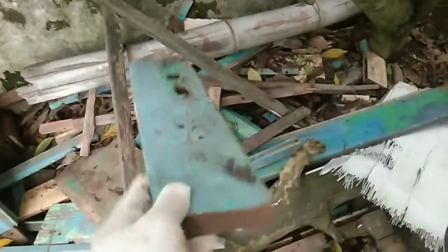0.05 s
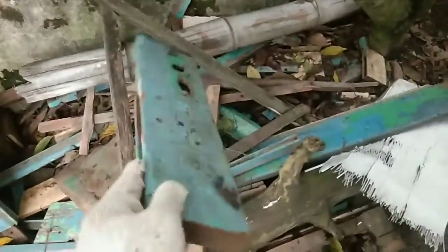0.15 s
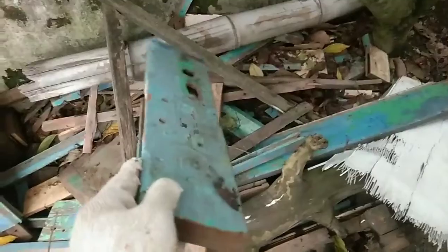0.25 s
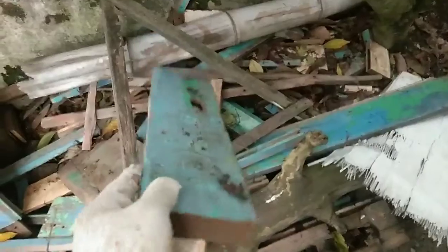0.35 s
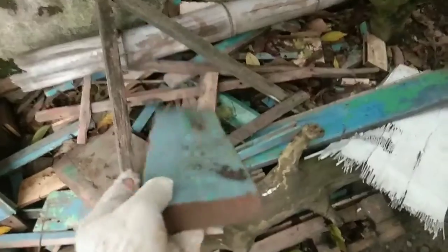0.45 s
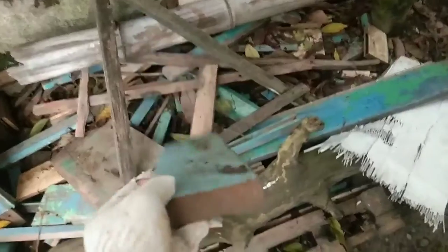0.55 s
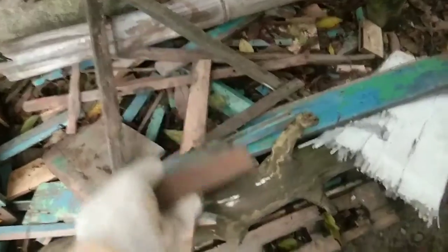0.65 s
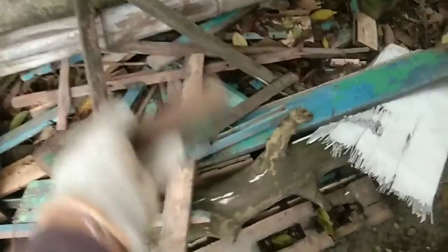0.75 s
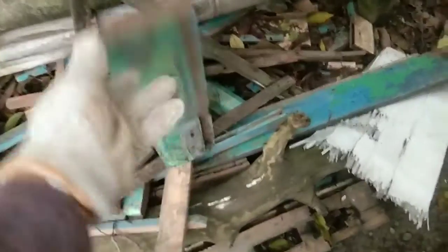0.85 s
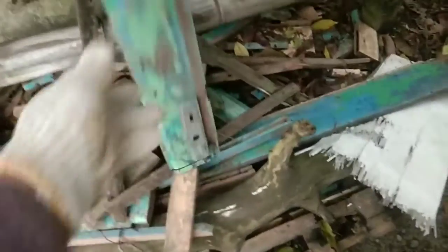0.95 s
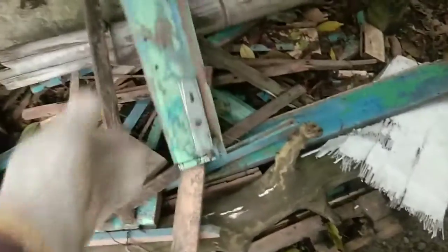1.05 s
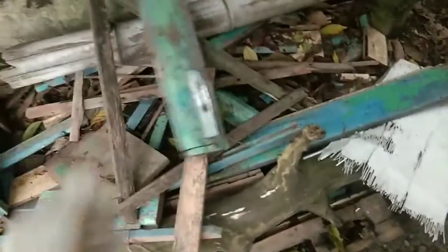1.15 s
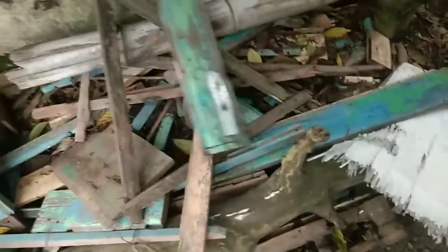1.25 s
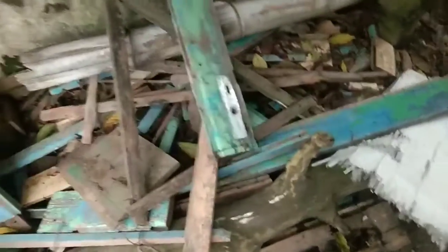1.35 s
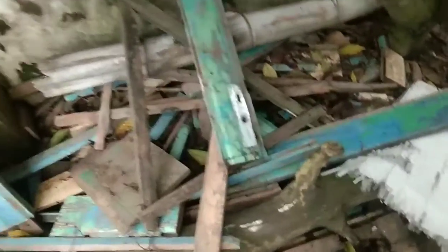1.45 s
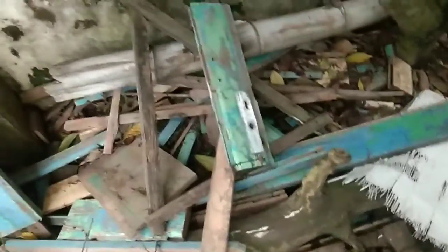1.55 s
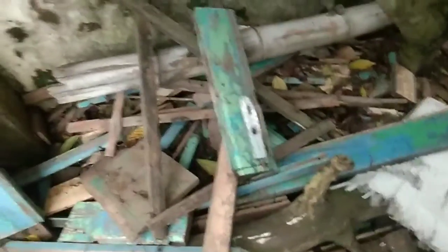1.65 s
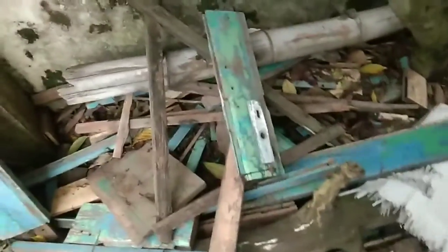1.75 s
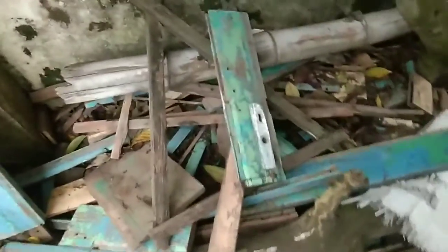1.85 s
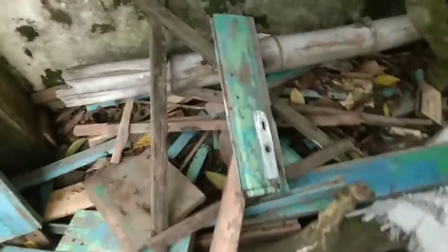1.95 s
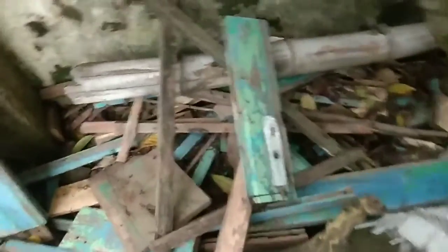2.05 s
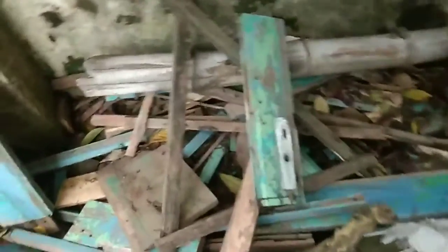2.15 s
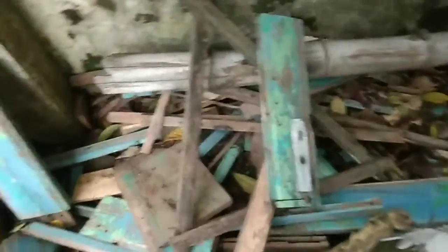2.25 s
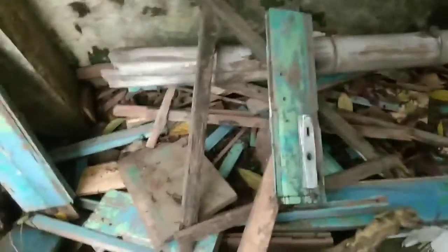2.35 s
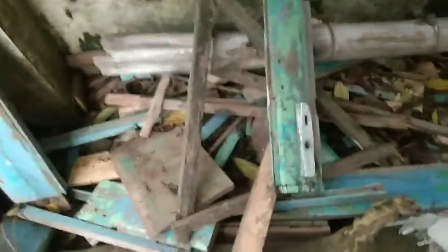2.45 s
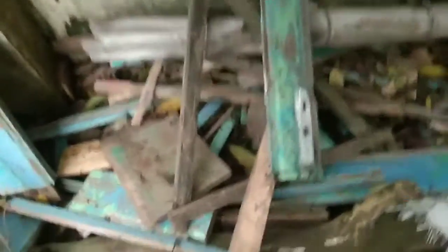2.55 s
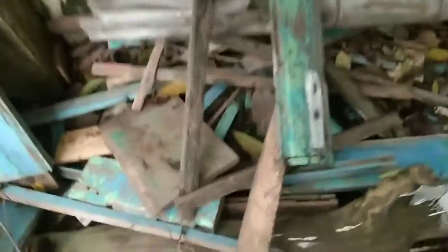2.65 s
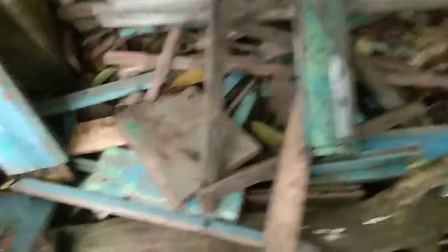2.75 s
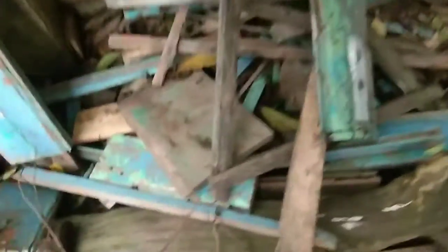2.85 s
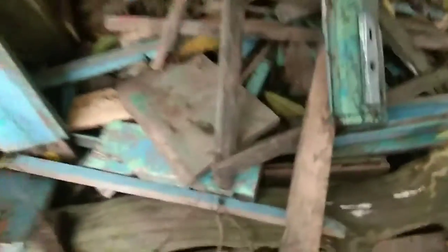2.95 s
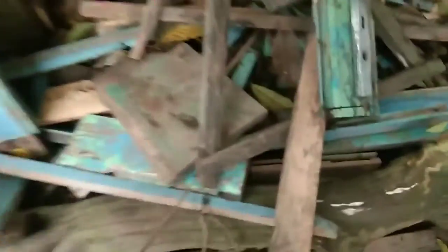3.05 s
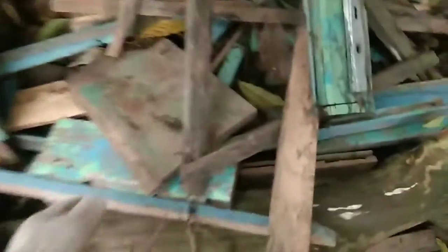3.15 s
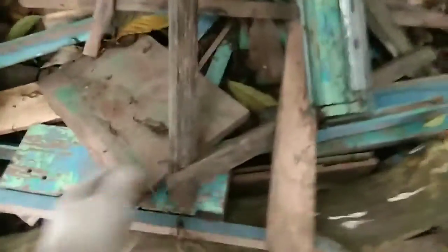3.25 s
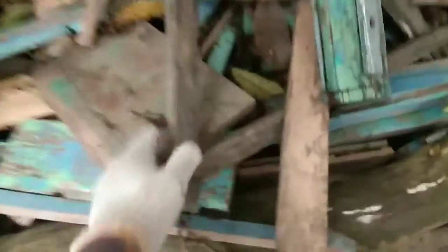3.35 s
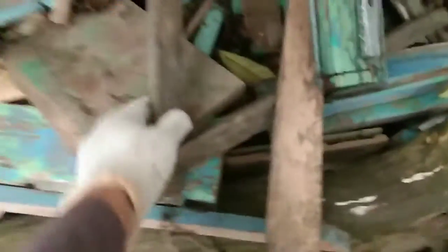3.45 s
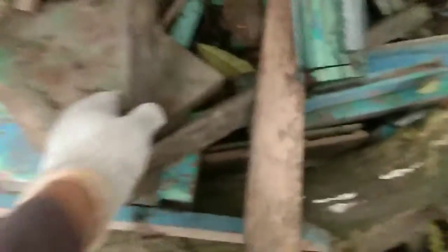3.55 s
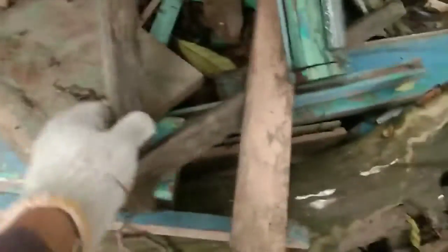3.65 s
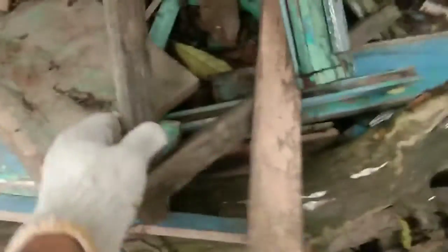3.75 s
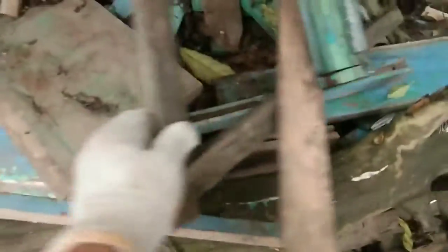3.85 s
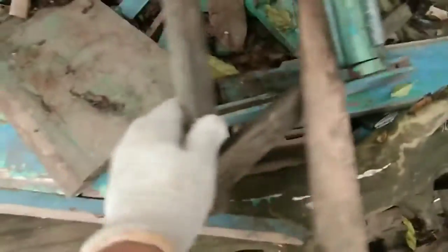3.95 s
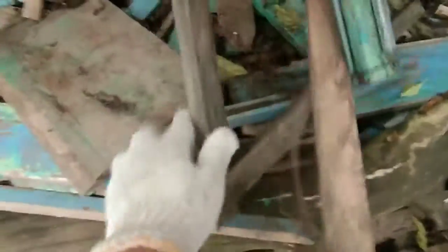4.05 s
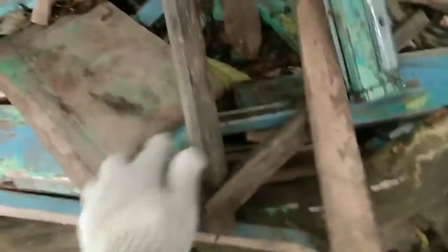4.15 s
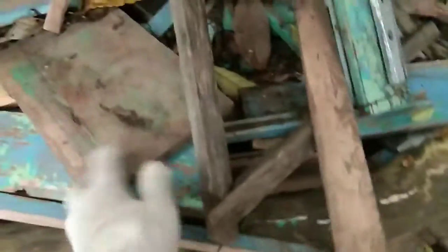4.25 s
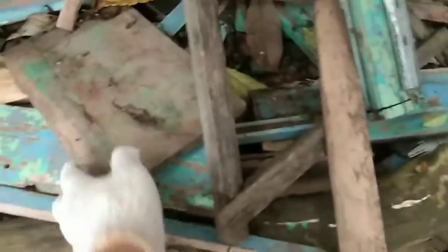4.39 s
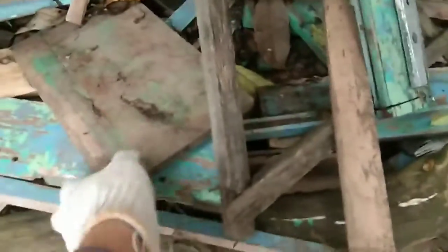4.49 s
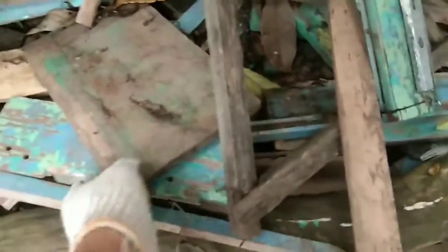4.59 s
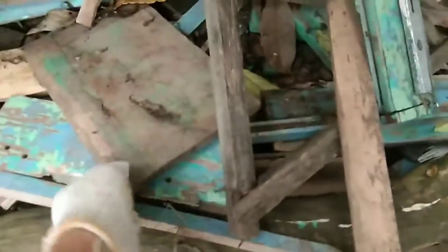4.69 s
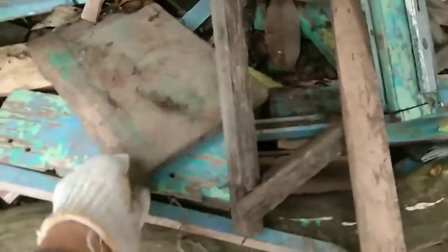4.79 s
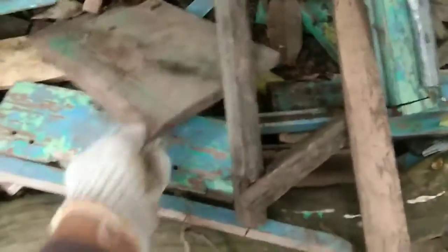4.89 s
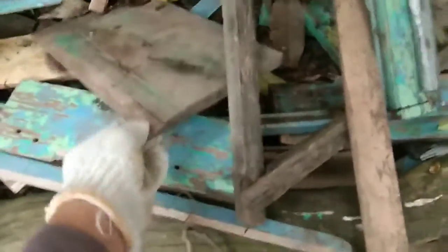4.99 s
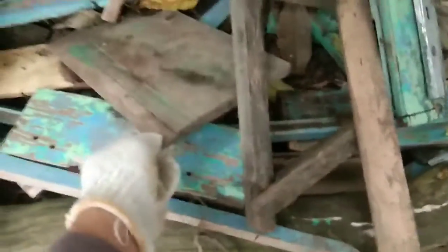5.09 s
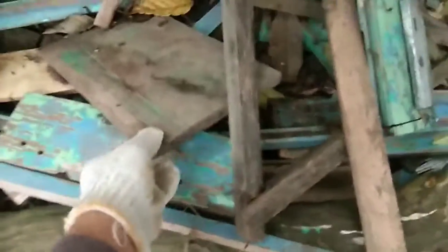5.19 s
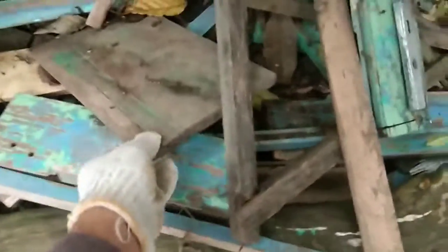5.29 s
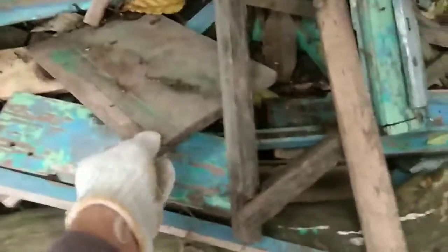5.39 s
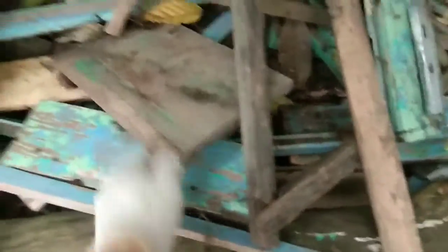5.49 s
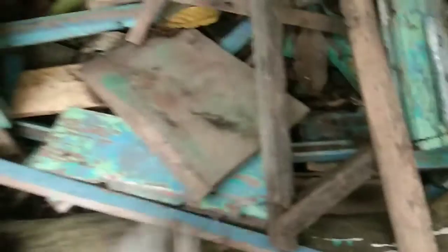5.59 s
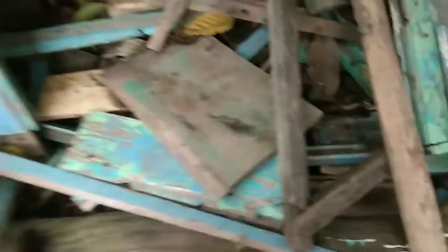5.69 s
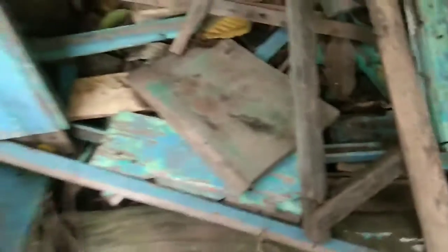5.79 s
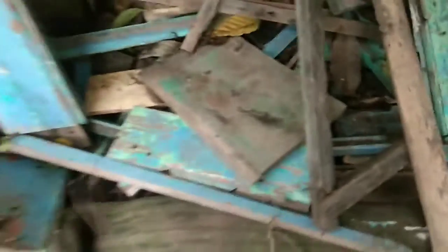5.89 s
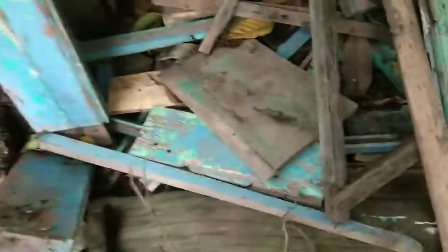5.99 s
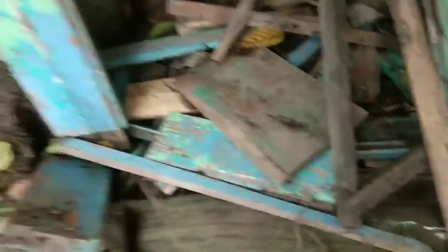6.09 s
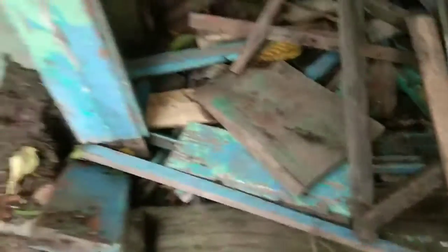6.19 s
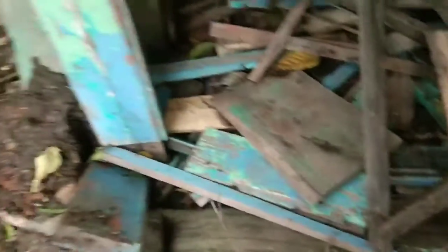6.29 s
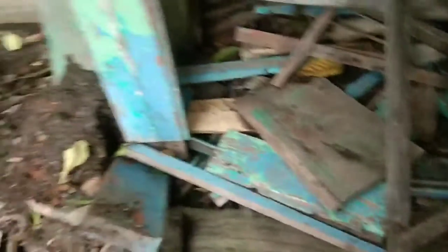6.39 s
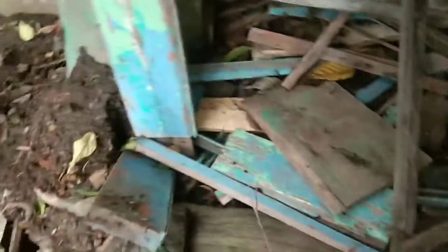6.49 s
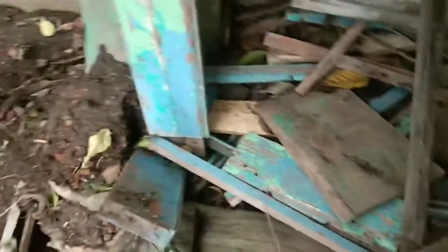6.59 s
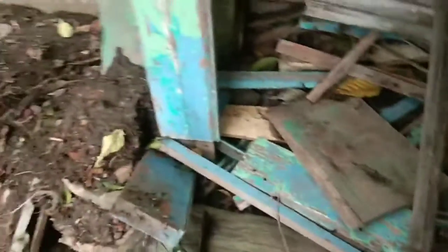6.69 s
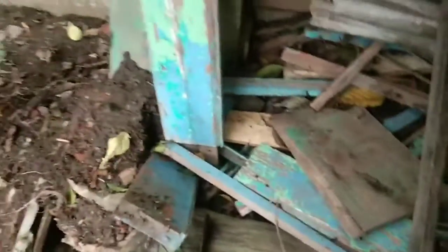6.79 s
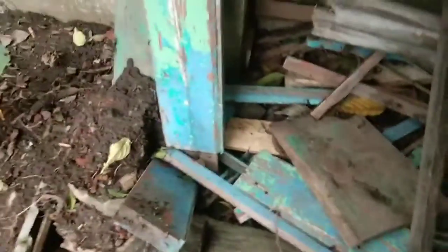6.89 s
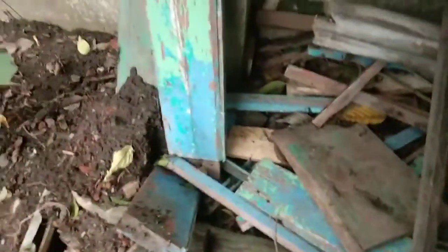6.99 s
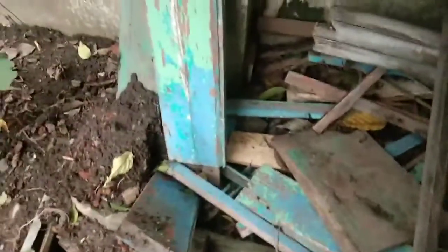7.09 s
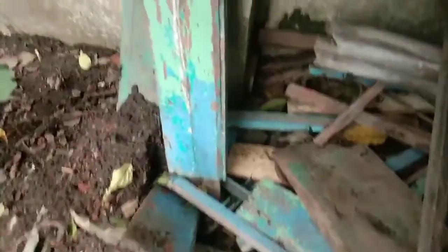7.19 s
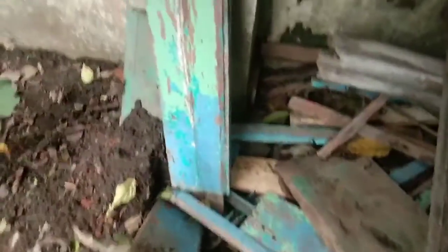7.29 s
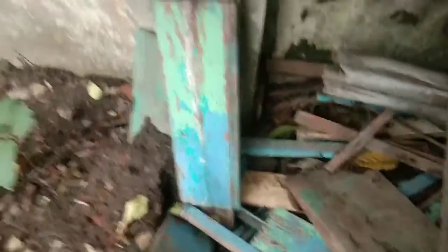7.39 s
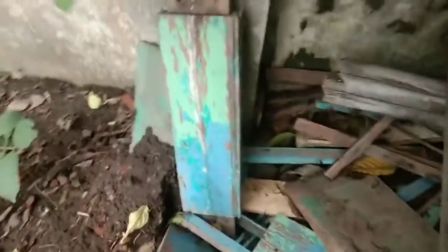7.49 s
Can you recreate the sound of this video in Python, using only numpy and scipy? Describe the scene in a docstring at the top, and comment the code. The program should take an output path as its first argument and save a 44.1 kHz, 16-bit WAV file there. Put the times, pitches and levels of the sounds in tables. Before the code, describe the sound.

A tossed plank lands on scrap wood with a loud double clack and metal jingle, then a hand knocks and scrapes other boards.

```python
"""A tossed plank lands on a scrap pile with a double clack that overloads a small, close microphone.
The blows make the wood ring and shake a loose metal fitting, which jingles.
Then a gloved hand scrapes and knocks other boards. Splinters and dry leaves crackle,
a far bird calls once, and the walls of the yard add a faint echo.
Behind it all are a low rumble, a rustling sleeve and a steady hiss."""
import sys
import numpy as np
from scipy import signal
from scipy.fft import rfft, irfft
from scipy.io import wavfile

SR = 44100
rng = np.random.default_rng(int(sys.argv[2]) if len(sys.argv) > 2 else 0)


def log_audio(samples):
    """Write samples as a 16-bit WAV file to the path given in sys.argv[1]."""
    # one column per channel
    frames = np.atleast_2d(samples).T
    # limit to full scale, then quantise
    limited = np.clip(frames, -1, 1)
    pcm = np.round(limited * 32767).astype(np.int16)
    wavfile.write(sys.argv[1], SR, pcm)


N = 332324
TIME = np.arange(N) / SR  # seconds through the whole scene
AGE = TIME[:SR // 2]  # seconds since one short sound began

# The tones of a bending plank. A fade time is how long a sound takes to drop by 60 dB.
# columns: pitch_hz, level_db, fade_s
PLANK_TONES = [(460, -6, .08), (530, -9, .06), (660, -10, .05), (770, -5, .08), (916, -3, .07),
               (996, -3, .09), (1040, -9, .18), (1163, -9, .15), (1325, -3, .07), (1486, -11, .13),
               (1637, -9, .05), (1757, -9, .08), (1900, -9, .09), (2035, -10, .12), (2146, -7, .09),
               (2256, -16, .2), (2430, -13, .13), (2685, -13, .1), (2948, -11, .1), (3240, -12, .08)]
# Blows of wood on wood; the faint rows at 1.034 s and 1.3463 s are echoes of the loud hits returning from the
# yard walls. The scuff is how long the boards grind together. # columns: start_s, level_db, pitch_hz,
# brightness_hz, scuff_s
KNOCKS = [(.956, -7.5, 1350, 2150, 0.0014), (1.034, -31.5, 1400, 2600, 0.0031),
          (1.2532, 4.5, 880, 2360, .0012), (1.264, -10.5, 750, 3000, 0.0056),
          (1.2763, 1.5, 1030, 3800, 0.00088), (1.279, -2, 997, 1850, .003), (1.285, -10, 1320, 2050, .006),
          (1.3463, -18, 1130, 2200, 0.014), (3.351, -38.5, 446, 1000, .001),
          (3.7624, -24, 890, 2640, .0016), (3.808, -31.5, 780, 2300, 0.024),
          (3.8553, -27.5, 1200, 3800, .001), (3.876, -25.5, 1140, 2300, .008),
          (3.971, -33, 796, 2300, .005), (4.194, -23.5, 1310, 2900, 0.0089),
          (4.2305, -16, 1230, 2290, 0.012), (4.2463, -6.5, 617, 2080, .004),
          (4.252, -16, 990, 1950, 0.0032), (4.3178, -22.5, 800, 2600, .005),
          (4.3438, -22.5, 670, 2130, 0.016), (4.3825, -27.5, 900, 2820, 0.0077),
          (4.8498, -32.5, 770, 3000, 0.0045), (4.9866, -25, 806, 3200, .001),
          (5.0504, -29.5, 580, 2170, 0.0035), (5.668, -25.5, 470, 3100, .002),
          (5.685, -25.5, 745, 2300, .003), (5.691, -23.5, 245, 3720, 0.0023)]


def knocks(tones_db=-16, rattle_db=-7, crack_db=-2, crack_fade_s=0.021, note_cycles=22):
    """Each blow cracks where it lands, rings the plank, and rattles and thumps the pile below."""
    tone_hz, tone_db, tone_fade_s = np.transpose(PLANK_TONES)[:, :, None]
    signs = (-1) ** np.arange(len(tone_hz))[:, None]
    tones = signs * gain(tone_db) * np.sin(2 * np.pi * tone_hz * AGE)
    out = np.zeros(N)
    for start_s, level_db, pitch_hz, brightness_hz, scuff_s in KNOCKS:
        rattle_fade_s = 0.032 + 13 * scuff_s  # a longer scuff rattles longer
        dying = fade(tone_fade_s * np.sqrt(rattle_fade_s / 0.054))  # and lets the board ring longer
        shares = gain(3 * rng.standard_normal(len(tone_hz)))  # each spot favours different tones
        plank = gain(tones_db) * (shares @ (tones * dying))
        note_db = 1.5 - 13 * max(np.log2(brightness_hz / 1980), 0)  # sharp blows hide the hollow note
        note = gain(note_db) * np.sin(2 * np.pi * pitch_hz * AGE) * fade(note_cycles / pitch_hz)
        loudness = gain(rattle_db) * fade(rattle_fade_s) + gain(crack_db) * fade(crack_fade_s)
        loudness = np.interp(AGE - scuff_s, AGE, loudness)  # stays up until the scuff ends
        clatter = loudness * rng.standard_normal(len(AGE))
        blow = keep_side(plank + note + clatter, 0.74 * pitch_hz, "high")  # narrow boards lack bass
        blow += pile_thud(level_db, pitch_hz)
        blow = keep_side(blow, brightness_hz, "low", order=3)  # a soft contact sounds dull
        add(out, start_s, gain(level_db) * blow)
        add(out, start_s, pile_shudder(level_db))
    return out


def pile_thud(blow_db, board_hz, thud_hz=135, fade_s=0.069):
    """The pile thumps under a blow; low-pitched boards shake it most."""
    thud = normalize(resonance(rng.standard_normal(len(AGE)), thud_hz, 0.88)) * fade(fade_s)
    share_db = -17 - 0.19 * blow_db  # the pile gives way under hard blows
    return gain(share_db) * thud * thud_hz / board_hz


def pile_shudder(blow_db, low_hz=850, high_hz=3460, fade_s=0.47):
    """Loose boards keep shaking after a blow, far more after a hard one."""
    shudder = keep_side(rng.standard_normal(len(AGE)), low_hz, "high")
    shudder = keep_side(shudder, high_hz, "low", order=3)
    share_db = -21.5 + 0.67 * blow_db
    return gain(blow_db + share_db) * shudder * fade(fade_s)


# The tones of the metal fitting when it is free to ring.
# columns: pitch_hz, level_db, fade_s
METAL_TONES = [(4156, -7, .3), (4247, 3, .2), (4867, 1, .22), (5480, -14, .2), (6010, -10, .3),
               (6570, -8, .33), (6885, -13, .25), (7120, -10, .35), (7490, -5, .25), (8120, -4, .2),
               (8366, -5, .33), (9350, -15, .2), (10020, -7, .2), (10290, -4, .25), (10450, -5, .25),
               (10880, -8, .28), (12350, -12, .3), (12750, -14, .35), (14700, -14, .3), (15280, -10, .25)]
# Jolts that shake the fitting. Freedom runs from 0 (pinched tight) to 1 (free).
# columns: start_s, level_db, freedom
JOLTS = [(.94, -18, 0.29), (1.26, 2, 0.22), (1.269, -10.5, 1), (1.322, -18.5, 0.97), (1.429, -27.5, 0.46),
         (3.853, -19.5, 0.42), (3.894, -21.5, 0.44), (4.2262, -5, 0.23), (4.253, -10.5, 0.53),
         (4.361, -26, 0.7)]


def metal_fitting(trim_db=-9, rise_s=0.0031, chatter_depth=0.64, chatter_hz=25,
                  buzz_db=-5, buzz_fade_s=0.59, pinched_hz=8600, free_hz=3500):
    """Thin, loose metal rings after each jolt and chatters against the wood that holds it."""
    hz, tone_db, fade_s = np.transpose(METAL_TONES)[:, :, None]
    out = np.zeros(N)
    for start_s, level_db, freedom in JOLTS:
        low_hz = pinched_hz * (free_hz / pinched_hz) ** freedom  # freer metal reaches lower tones
        strength = gain(tone_db) / np.sqrt(1 + (low_hz / hz) ** 8)
        phase = rng.uniform(0, 2 * np.pi, hz.shape)
        tones = np.exp(1j * (2 * np.pi * hz * AGE + phase))
        jitter = normalize(keep_side(rng.standard_normal((2, len(hz), len(AGE))), chatter_hz, "low"))
        chatter = 1 + chatter_depth * (jitter[0] + 1j * jitter[1])  # repeated taps upset each tone
        ring = (strength * chatter * fade(fade_s * freedom) * tones).real.sum(0)
        buzz = keep_side(rng.standard_normal(len(AGE)), low_hz, "high")
        buzz *= gain(buzz_db) * fade(buzz_fade_s * freedom)
        rise = 1 - np.exp(-AGE / rise_s)
        add(out, start_s, gain(level_db + trim_db) * (ring + buzz) * rise)
    return out


# Slides of wood or glove over rough grain.
# columns: start_s, length_s, level_db, squeak_hz, squeak_db, treble_db
SCRAPES = [(.876, 0.095, -37, 2200, -10, -4.5), (3.518, 0.018, -35, 2100, 21, 8),
           (3.675, 0.16, -44.5, 678, 19.5, -11), (3.849, .1, -35.5, 2180, -11, 0),
           (4.087, .2, -42.5, 1950, 6, -10), (4.192, .15, -31, 2170, -18, -7),
           (4.538, 0.037, -33, 2190, 14.5, 10), (4.8, 0.1, -44, 2240, 14, 5),
           (4.931, 0.055, -42.5, 2300, 13, -7), (4.964, 0.044, -34.5, 1990, 19, -8),
           (5.123, 0.012, -34, 2030, 18, 10), (5.4594, 0.01, -35, 2040, 16, 4),
           (5.529, 0.078, -37.5, 2155, 22, -1), (5.635, 0.073, -36, 2220, -1, 2)]


def scrapes(trim_db=-1, slips_per_s=5000, sharpness=12, overtone_ratio=1.51, overtone_db=-7.5):
    """Wood fibres catch and slip in quick ticks; the board rings with them in a dry squeak."""
    out = np.zeros(N)
    for start_s, length_s, level_db, squeak_hz, squeak_db, treble_db in SCRAPES:
        slips = normalize(random_ticks(len(AGE), slips_per_s, spread_db=4))
        slips = keep_side(slips, hz=700, side="high", order=1)
        treble = keep_side(slips, hz=4500, side="high", order=1)
        slips += (gain(treble_db) - 1) * treble
        progress = AGE / length_s
        stroke = np.clip(10 * progress, 0, 1) * np.exp(-0.14 * progress - progress ** 6)  # rise, sag, stop
        rub = slips * stroke
        squeak = resonance(rub, squeak_hz, sharpness)
        squeak += gain(overtone_db) * resonance(rub, overtone_ratio * squeak_hz, sharpness)
        scrape = rub + gain(squeak_db) * squeak
        average_level = np.sqrt(np.sum(scrape ** 2) / (length_s * SR))
        add(out, start_s, gain(level_db + trim_db) * scrape / average_level)
    return out


# Spells of crackling from disturbed splinters and dry leaves.
# columns: start_s, length_s, level_db
CRACKLES = [(.49, .05, -45), (.87, .08, -40), (1.48, .5, -44), (3.3, .4, -49.5), (4.38, 1, -48.5),
            (5.54, .17, -41.5), (6.1, .6, -54)]


def litter(ticks_per_s=600, treble_db=9):
    """Splinters and dry leaves give way in tiny random ticks."""
    ticks = keep_side(random_ticks(N, ticks_per_s, spread_db=3), hz=1800, side="high", order=1)
    treble = gain(treble_db) * keep_side(ticks, hz=7000, side="high")
    return normalize(ticks + treble) * swells(CRACKLES, shape=0.37)


def bird(start_s=6.77, length_s=0.115, from_hz=5950, to_hz=7300, level_db=-55):
    """A far bird gives one thin whistle that holds its note, then slides up."""
    progress = np.clip((TIME - start_s) / length_s, 0, 1)
    pitch_hz = from_hz + (to_hz - from_hz) * progress ** 2.5
    whistle = np.sin(2 * np.pi * np.cumsum(pitch_hz) / SR)
    return whistle * swells([(start_s, length_s, level_db)], shape=0.5)


# How long low and high sounds linger in the yard.
# columns: pitch_hz, fade_s
YARD_FADES = [(150, 0.65), (1000, 0.5), (2200, 0.49), (5000, 0.6), (12000, 0.054)]


def yard_echo(sound, scatter_db=-22, build_s=0.007, echo_db=-32, echo_s=0.061):
    """Sound scatters off the pile and walls, and one faint echo returns from the far wall."""
    hz, seconds, bands = signal.stft(rng.standard_normal(len(AGE)), SR, nperseg=256)
    dying = np.exp(-np.log(1000) * seconds / value_at(YARD_FADES, hz)[:, None])
    tail = signal.istft(bands * dying, SR)[1][:len(AGE)]
    tail *= 1 - np.exp(-AGE / build_s)
    tail *= gain(scatter_db) / np.linalg.norm(tail)
    add(tail, echo_s, gain([echo_db]))
    return signal.fftconvolve(sound, tail)[:N]


# The rustle's mix of low and high sound.
# columns: pitch_hz, level_db
RUSTLE_COLOUR = [(40, -40), (100, -6), (180, -0.5), (260, -7), (400, -16.5), (700, -26.5), (1500, -40),
                 (4000, -63)]
# Arm movements that rub the sleeve.
# columns: start_s, length_s, level_db
ARM_MOVES = [(-.03, 0.32, -36), (.4, 0.42, -36), (.78, 0.33, -41), (1.1, 0.61, -43), (1.93, 0.53, -42),
             (2.52, 0.43, -48), (4.85, 0.64, -48)]


def sleeve_rustle(trim_db=-1, still_db=-52.5, uneven_db=2):
    """Soft handling noise swells each time the arm moves and rubs the sleeve."""
    movement = gain(still_db) + swells(ARM_MOVES, shape=0.48)
    return noise(RUSTLE_COLOUR) * movement * gain(trim_db + uneven_db * wander(rate_hz=9))


# The rumble's mix of low and high sound.
# columns: pitch_hz, level_db
RUMBLE_COLOUR = [(20, -22), (40, -18.5), (64, 2), (100, 0), (160, -11), (300, -17.5), (600, -34.5),
                 (1500, -31), (4000, -66)]
# How loud the rumble is as time passes.
# columns: time_s, level_db
RUMBLE_LEVELS = [(0, -47), (.45, -46), (.7, -42), (1.3, -44), (1.5, -52), (2, -49), (2.55, -46.5),
                 (2.92, -39.5), (3.1, -42.5), (4.6, -41), (5.2, -39), (5.5, -42.5), (6.4, -46), (6.6, -42),
                 (7.54, -41.5)]


def rumble():
    """A low outdoor rumble slowly rises and falls."""
    return noise(RUMBLE_COLOUR) * gain(np.interp(TIME, *np.transpose(RUMBLE_LEVELS)))


# The hiss's mix of low and high sound.
# columns: pitch_hz, level_db
HISS_COLOUR = [(180, -14), (300, -5), (404, -7.5), (544, -6.5), (600, -9), (892, -9.5), (1220, -11.5),
               (1390, -10), (1780, -6.5), (2170, 0), (3080, -14), (5670, -15), (7500, -10.5), (9150, -26),
               (15500, -37)]


def hiss(level_db=-45, drift_db=0.5):
    """An even hiss whose level barely drifts."""
    return gain(level_db + drift_db * wander(rate_hz=2.5)) * noise(HISS_COLOUR)


# How the microphone's small opening colours the sound.
# columns: pitch_hz, boost_db
MIC_COLOUR = [(100, 10.5), (1300, -1.5), (1750, 2), (2200, 11), (2800, -1.5), (5200, -5.5), (7600, 3),
              (8400, -4), (9200, -11.5), (11000, -14.5), (15000, -16.5)]


def microphone(sound, size=4096):
    """The microphone's opening boosts some pitches and weakens others."""
    log_gain = np.log(gain(value_at(MIC_COLOUR, abs(np.fft.fftfreq(size, 1 / SR)))))
    response = np.exp(np.conj(signal.hilbert(log_gain)))  # rings after a sound, never before it
    click_response = np.fft.ifft(response).real[:size // 2]
    return signal.oaconvolve(sound, click_response)[:N]


def gain(db):
    """Turns decibels into a number to multiply by."""
    return 10 ** (np.asarray(db) / 20)


def normalize(sound):
    """Scales a sound to an average (rms) level of 1."""
    return sound / np.sqrt(np.mean(sound ** 2) + 1e-20)


def value_at(table, hz):
    """Looks up a pitch in a table, sliding smoothly between rows."""
    pitches, values = np.transpose(table)
    return np.interp(np.log(hz + 1), np.log(pitches), values)


def add(mix, start_s, sound):
    """Mixes a sound in at its start time."""
    part = mix[round(start_s * SR):][:len(sound)]
    part += sound[:len(part)]


def fade(fade_s):
    """Dies away by 60 dB every fade_s seconds."""
    return np.exp(-np.log(1000) * AGE / fade_s)


def keep_side(sound, hz, side, order=2):
    """Keeps the "low" or "high" side of hz; a higher order cuts more steeply."""
    return signal.sosfilt(signal.butter(order, hz, side, fs=SR, output="sos"), sound)


def resonance(sound, hz, sharpness):
    """Keeps the sound near one pitch; more sharpness rings longer."""
    return signal.lfilter(*signal.iirpeak(hz, sharpness, fs=SR), sound)


def noise(colour):
    """Steady noise with the given mix of low and high sound."""
    weights = gain(value_at(colour, np.fft.rfftfreq(N, 1 / SR)))
    return normalize(irfft(rfft(rng.standard_normal(N)) * weights, N))


def random_ticks(samples, per_s, spread_db):
    """Tiny clicks at random moments, most weak and a few strong."""
    happens = rng.random(samples) < per_s / SR
    size = np.minimum(rng.exponential(1, samples), 3)
    return happens * gain(spread_db * size) * rng.choice([-1, 1], samples)


def wander(rate_hz):
    """A slow random drift with a typical size of 1."""
    weights = 1 / (1 + (np.fft.rfftfreq(N, 1 / SR) / rate_hz) ** 4)
    return normalize(irfft(rfft(rng.standard_normal(N)) * weights, N))


def swells(rows, shape):
    """One rounded rise and fall per row; a smaller shape gives a flatter top."""
    return sum(gain(level_db) * np.sin(np.pi * np.clip((TIME - start_s) / length_s, 0, 1)) ** shape
               for start_s, length_s, level_db in rows)


def scene():
    """Wood, metal, litter and a bird over the background, the same in both channels."""
    sources = knocks() + scrapes() + metal_fitting() + litter() + bird()
    heard = microphone(sources + yard_echo(sources))
    return np.tile(heard + rumble() + sleeve_rustle() + hiss(), (2, 1))


def record(dry, top_hz=15700):
    """The loudest clacks overload and lose their peaks; then the highest treble is cut."""
    clipped = np.clip(dry, -1, 1)
    treble_cut = signal.firwin(511, top_hz, window=("kaiser", 9), fs=SR)
    return signal.oaconvolve(clipped, treble_cut[None], "same", axes=1)


dry = scene()
out = record(dry)
log_audio(out)
```